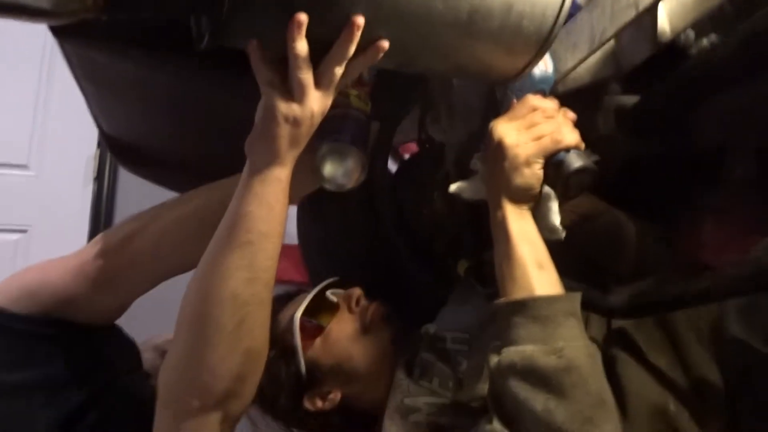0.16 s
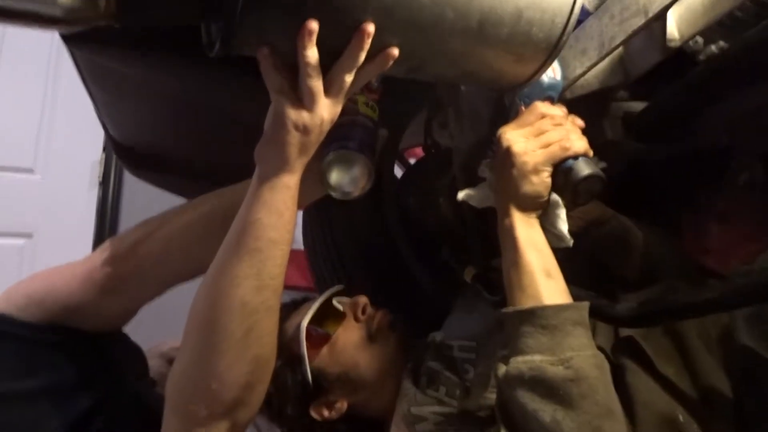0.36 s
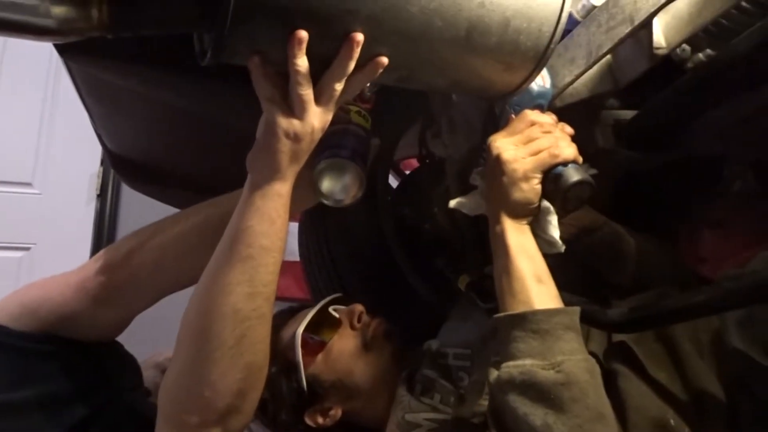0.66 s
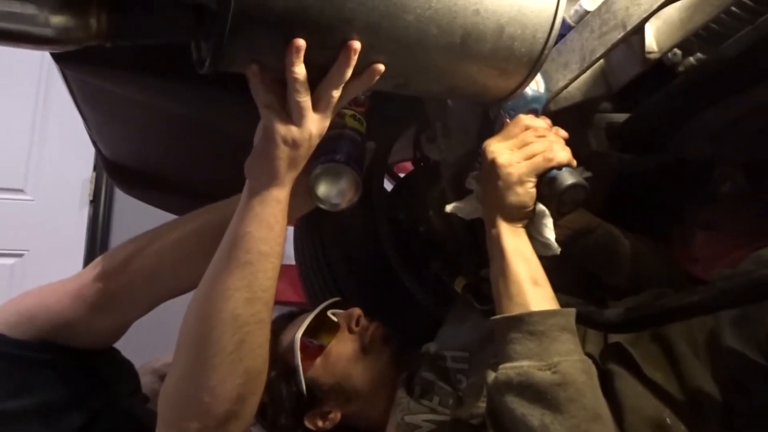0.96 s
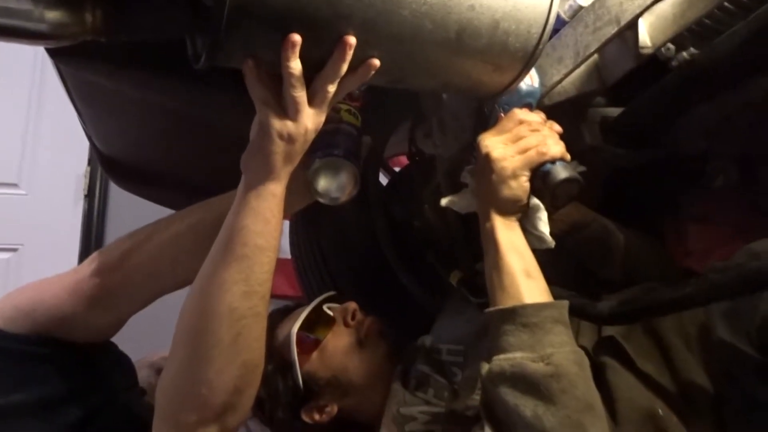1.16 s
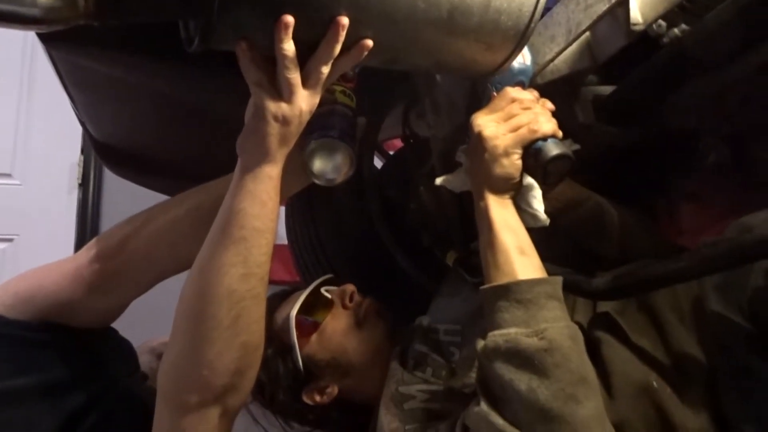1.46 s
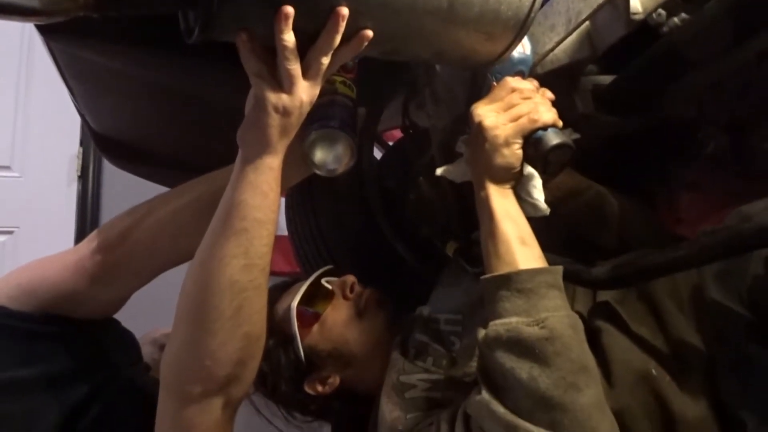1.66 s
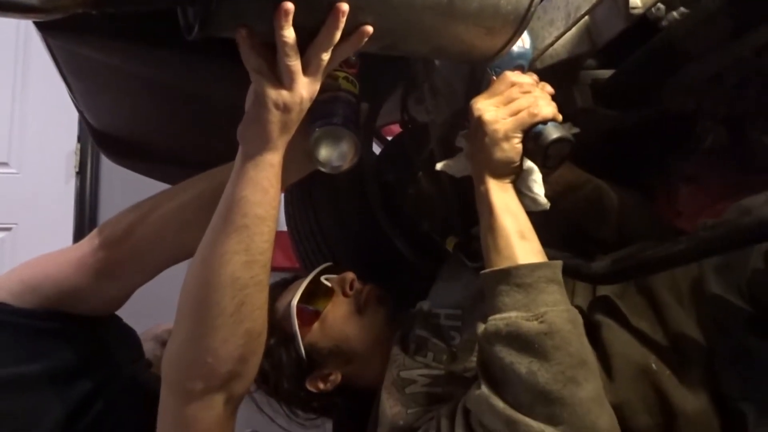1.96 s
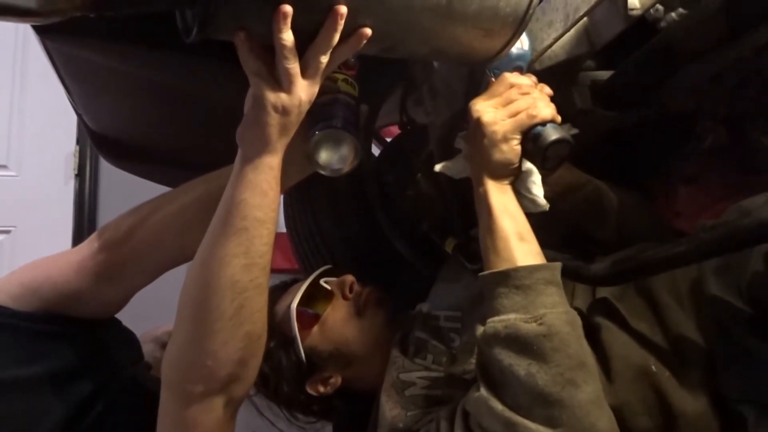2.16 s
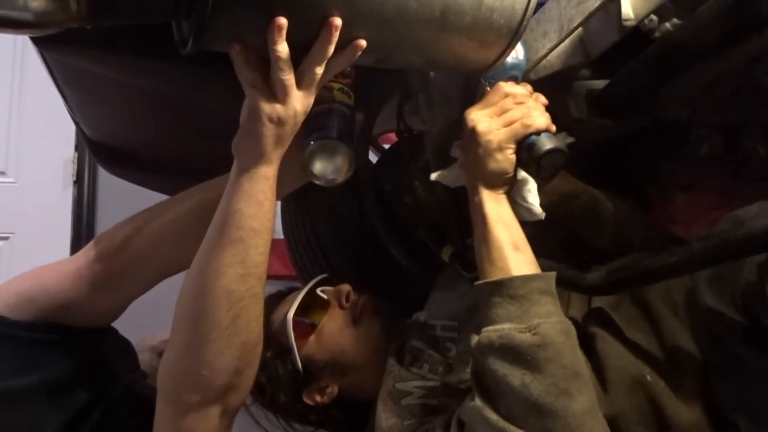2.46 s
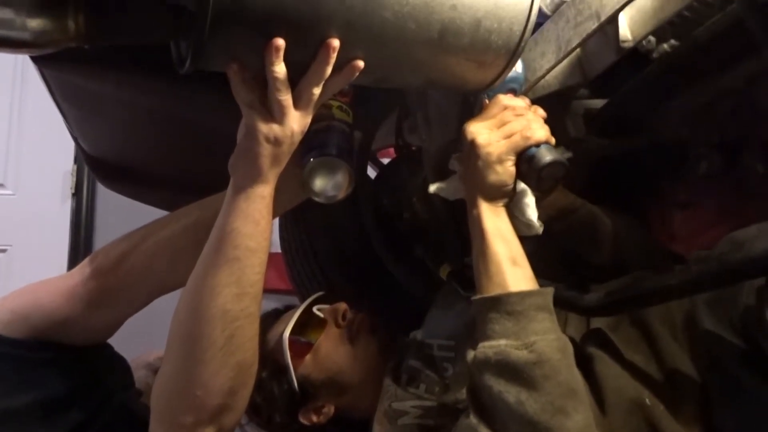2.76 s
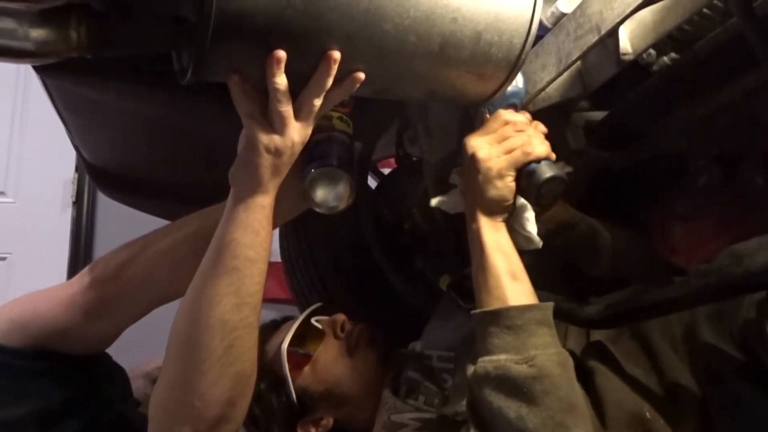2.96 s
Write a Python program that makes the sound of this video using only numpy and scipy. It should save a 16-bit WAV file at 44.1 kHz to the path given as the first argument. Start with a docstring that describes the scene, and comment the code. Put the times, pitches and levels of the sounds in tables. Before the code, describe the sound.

A battery reciprocating saw cuts a steel exhaust pipe under a car without pause, a fast buzzing metallic rasp with shifting rings, rougher near the end, heard close by on a phone in a garage.

```python
"""The fast, harsh rasp of a cordless reciprocating saw cutting a steel exhaust pipe under a car.
The same teeth drag over the cut on every stroke, so their force nearly repeats at the stroke rate.
Each new stroke bites with a knock, and this force rings the pipe and the silencer can.
Under it lie a faint motor hum and the low rumble of the garage, made from filtered noise.
A phone close by hears it all: it cuts the top treble and turns down the loudest peaks."""
import sys
import numpy as np
from scipy import signal
from scipy.fft import rfft, irfft
from scipy.io import wavfile
from scipy.ndimage import uniform_filter1d, minimum_filter1d, map_coordinates

SR = 44100
rng = np.random.default_rng(int(sys.argv[2]) if len(sys.argv) > 2 else 0)


def generate_wav(signal):
    """Clip the signal to [-1, 1] and save it as 16-bit WAV at the path in sys.argv[1]."""
    frames = np.transpose(np.atleast_2d(signal))
    scaled = np.clip(frames, -1, 1) * 32767
    pcm = np.round(scaled).astype(np.int16)
    wavfile.write(sys.argv[1], SR, pcm)


N = 136710  # length in samples

# Speed of the blade; the motor sags as the blade is pressed in: t/s, rate/strokes per s
STROKE_RATE = [(0, 37.7), (.1, 37.7), (.29, 38.2), (.53, 37.95), (.7, 37.35), (.86, 36.72), (1.05, 37.22),
               (1.19, 37.5), (1.28, 37.35), (1.42, 36.83), (1.52, 37.0), (1.73, 38.0), (1.86, 38.0),
               (1.98, 37.6), (2.18, 38.1), (2.34, 38.65), (2.48, 38.2), (2.65, 38.7), (2.76, 37.2),
               (2.9, 35.6), (3.1, 35.7)]
# How much of the tooth force repeats from stroke to stroke; rough near the end: t/s, share of power/0-1
REPEAT_SHARE = [(0, 0.27), (.2, 0.77), (1.6, 0.78), (2.5, 0.52), (2.7, 0.48), (3.1, 0.31)]
# Rasp in four ranges: t/s, level/dB under the lowest split, then middle, lower treble, upper treble
RASP_LEVELS = [(0.0, -43.5, -16.5, -24, -22.5), (0.48, -45, -19.5, -23, -20.5), (0.7, -45, -19, -23.5, -21),
               (0.83, -36, -18.5, -26, -24), (0.91, -39.5, -19, -24.5, -26.5),
               (1.11, -39.5, -19.5, -22.5, -21.5), (1.29, -45, -17, -25.5, -24),
               (1.39, -37.5, -17.5, -26, -24), (1.67, -45.5, -18, -25, -22), (2.3, -41.5, -17, -23, -19),
               (2.49, -44, -17.5, -25.5, -23.5), (2.54, -45, -15.5, -26, -19), (2.65, -41, -17, -24, -24.5),
               (2.72, -34.5, -13.5, -32, -29), (2.88, -37, -15.5, -27, -28.5), (2.93, -39, -16, -29, -29),
               (2.98, -34, -14.5, -28, -24.5), (3.0, -42, -15, -31, -30), (3.03, -40, -16, -27, -24),
               (3.1, -39.5, -15.5, -27, -24)]
# Borders between those four ranges: f/Hz
RASP_SPLITS = [840, 5600, 8000]
# Tone of the rasp between the modes, before its ranges are levelled: f/Hz, level/dB per Hz
RASP_TONE = [(30, -80), (400, -70), (560, -21), (680, -21), (800, -19), (1000, -1.5), (1250, -9.5),
             (1600, -7.5), (2500, -7), (3200, -2), (4000, -17), (5500, -4), (9000, -5.5), (11000, -7.5),
             (13000, -6.5), (16000, -17)]
# Weaker modes of pipe and can: f/Hz
MODE_PITCHES = [665, 775, 1049, 1165, 1500, 1745, 2131, 2401, 2545, 2699, 2818, 2958, 3251, 3340, 3750,
                4290, 4700, 5690, 6005, 6370, 6820, 6975, 7329, 7561, 7820, 8443, 8640, 8830, 9320, 9652,
                10100, 10300, 11500, 12800]
# Their widths: f/Hz
MODE_WIDTHS = [22, 25, 16, 40, 28, 40, 20, 18, 22, 35, 20, 40, 20, 90, 140, 80, 35, 50, 80, 60, 26, 70, 18,
               20, 55, 22, 40, 75, 66, 45, 80, 55, 50, 80]
# Their strengths relative to each other: level/dB
MODE_STRENGTHS = [-16.5, -21.5, -9.5, -8, -1.5, -2.5, -1.5, -6, -12, -7, -10, -4.5, -9.5, -6.5, -10.5, -10,
                  -1.5, -1, 4, -1, -6.5, -12, 0, 0, -7, -0.5, -9, -7, -0.5, 6, 2, 5.5, -18, -7]
# Strongest rings of pipe and can, low to high: f/Hz
RING_PITCHES = [893, 923.9, 1103.5, 1340, 1960, 2325, 2580, 3125, 4050, 4810, 5360]
# Width of each ring's first resonance: f/Hz
RING_WIDTHS = [14, 15, 16, 25, 45, 30, 300, 45, 900, 200, 140]
# Rings as the grip on the can shifts, before the bass is thinned: t/s, level/dB of each ring, low to high
RING_LEVELS = [(0.0, -44, -29, -33, -36, -25, -31, -34, -43, -39, -27, -32),
               (0.05, -35.5, -28.5, -23.5, -32, -22.5, -36, -27, -28, -34, -30, -22),
               (0.29, -31.5, -22.5, -27.5, -40, -27, -32, -29, -27, -28, -28, -27),
               (0.58, -30.5, -26.5, -23.5, -36, -24, -32, -32, -21.5, -31.5, -27, -24),
               (0.68, -28, -28, -34, -40, -25.5, -26, -34, -24, -29, -26, -24),
               (0.74, -25, -22, -38, -40, -30, -45, -30, -27, -32, -29, -24),
               (0.92, -40, -17.5, -32.5, -48, -27, -30, -30, -29.5, -29, -26, -26.5),
               (1.15, -29.5, -24, -34, -40, -23, -37, -29, -22, -31, -28, -27),
               (1.21, -29, -23.5, -42, -51, -23, -37, -29, -18.5, -33, -25, -34),
               (1.39, -37, -16, -33, -45, -26, -47, -33, -23, -32, -27, -23),
               (1.48, -36, -17.5, -44, -47, -34, -47, -29, -19.5, -34, -25, -34),
               (1.61, -28, -28, -47, -41, -25, -34, -35, -27, -32, -27.5, -29),
               (1.81, -37, -28, -24.5, -30, -27, -28, -27, -30.5, -27, -23.5, -31),
               (2.06, -32.5, -27, -31, -30.5, -24.5, -34, -42, -26, -34, -32, -34),
               (2.17, -33, -23, -25.5, -31, -25, -33, -46, -22, -30, -40, -27),
               (2.29, -26.5, -26, -34, -38, -36, -28, -49, -36, -27.5, -39, -22),
               (2.42, -41, -19, -33, -26, -28, -27, -36, -45, -28, -29, -31),
               (2.53, -45, -26.5, -31, -28, -25.5, -29, -40, -37, -27, -38, -23.5),
               (2.67, -29.5, -23, -25, -39, -23, -38, -33, -25, -22.5, -40, -28),
               (2.89, -32.5, -26, -61, -48, -40, -50, -28, -35, -24, -43, -33),
               (3.06, -26.5, -21.5, -40, -48, -26, -26, -25, -47, -31, -40, -21.5),
               (3.1, -24.5, -22, -44, -37, -23, -28, -31, -34, -28, -24, -31)]
# Push of the singing teeth on each ring, low to high: level/dB
RING_SWELLS = [10, 10, 6, 3, 4, 2, 6, 14, -20, 3, 4]
# The low rings hardly radiate below their pitch: f/Hz, level/dB
BASS_THINNING = [(20, -44), (500, -8.5), (850, -0.5), (22000, 0)]
# Tone of the faint garage rumble: f/Hz, relative level/dB per Hz
RUMBLE_TONE = [(20, -8), (60, -2), (150, -0.5), (300, 3), (500, 10), (800, -2), (2000, -60)]
# Faint motor hum: t/s, level/dB
HUM_LEVEL = [(0, -61.5), (1.3, -65), (1.6, -73), (3.1, -76)]
# Stereo width, side against mid: f/Hz, level/dB
STEREO_WIDTH = [(60, -14), (110, -19), (200, -49), (380, -4), (700, -27.5), (1290, -17), (2380, -12),
                (4400, -4), (8120, 0.5), (15000, -1)]

START_TURNS = 1.75  # place in the stroke cycle at the start
BITE_DB, BACK_DB, BITE_FADE_TURNS = 6, 2, 0.39  # jump at a bite, at the return stroke; fall to 37 %
BITE_SCATTER_DB, BITE_JITTER_TURNS = 1.2, .03  # random spread of the jump and of its delay
PATTERN_LIFE = 0.874  # likeness of one stroke's tooth pattern to the next
GRIT_DB, GRIT_FROM_HZ = 2, 1500  # mean random boost of fresh grit; it is thin below this pitch
KNOCK_DB, KNOCK_SCATTER_DB = -19, 7.1  # level beside the rasp; spread if no force repeated
SCATTER_T60_S, GARAGE_T60_S = 0.077, 0.2  # time for echoes to fall 60 dB
MODES_DB, MODE_WALK_DB = -26, 2.5  # shared mode level before range levelling; random wandering
SWELL_S = .016  # length of one swell of singing
RUMBLE_DB, RUMBLE_FLICKER_DB = -54, 3
HUM_HZ = 260.7
TREBLE_LEAN_DB = 5  # left against right, before the lean is shaped by pitch
TOP_HZ = 16000
LIMIT, LIMIT_S = .94, .003  # highest peak aimed for (full scale = 1), reach of the limiter


def undb(db):
    """Turn decibels into a plain amplitude factor."""
    return 10 ** (np.asarray(db) / 20)


def unit(x):
    """Scale to an average (RMS) level of 1."""
    return x / np.sqrt(np.mean(x ** 2))


def curve(table, col):
    """Draw straight lines through one column of a table over time."""
    points = np.array(table)
    return np.interp(np.arange(N) / SR, points[:, 0], points[:, col])


def smooth_twice(x, k):
    """Take a moving average over k samples, two times."""
    return uniform_filter1d(uniform_filter1d(x, k), k)


def walk(rate):
    """Random levels held 1 / rate s and slewed twice; spread near 1."""
    k = int(SR / rate)
    held = np.repeat(rng.standard_normal(N // k + 1), k)
    return 1.4 * smooth_twice(held, k)[:N]


def steady(x, span_s=0.073):
    """Divide out the slow level so that a curve can set it."""
    return x / np.sqrt(smooth_twice(x ** 2, int(span_s * SR)) + 1e-12)


def colour(x, table):
    """Shape the tone by (f/Hz, level/dB) points, joined on a logarithmic pitch scale."""
    hz = np.arange(N // 2 + 1) * SR / N + 1
    points = np.array(table, float)
    gain_db = np.interp(np.log(hz), np.log(points[:, 0] + 1), points[:, 1])
    return irfft(rfft(x) * undb(gain_db), N)


def mode(x, hz, width_hz):
    """Two-pole resonance, like one ringing pitch of metal; gain 1 at the centre."""
    return signal.lfilter(*signal.iirpeak(hz, hz / width_hz, fs=SR), x)


def scatter(x, t60_s):
    """Dense reflections between floor, car and walls: fading noise as an echo."""
    t = np.arange(16384) / SR
    echo = rng.standard_normal(len(t)) * undb(-60 * t / t60_s)
    return unit(signal.fftconvolve(x, echo)[:N])


def worn_teeth(turns, strokes):
    """Repeating tooth force: each stroke replays the last one's pattern, slightly changed."""
    points = 1170  # pattern points per stroke
    warmup = 20  # strokes dropped while the pattern settles
    noise = rng.standard_normal((strokes + warmup, points))
    pattern = signal.lfilter([np.sqrt(1 - PATTERN_LIFE ** 2)], [1, -PATTERN_LIFE], noise, axis=0)[warmup:]
    return unit(map_coordinates(pattern.ravel(), [turns * points], order=3))


def fresh_grit():
    """Grit that never repeats: uneven noise with thin bass."""
    grit = unit(rng.standard_normal(N) * undb(GRIT_DB * rng.exponential(size=N)))
    return colour(grit, [(20, -8), (1200, -8), (GRIT_FROM_HZ, 0), (22000, 0)])


def teeth():
    """Force on the pipe: a tooth pattern that slowly wears, fresh grit, and a knock at each bite."""
    turns = START_TURNS + np.cumsum(curve(STROKE_RATE, 1)) / SR
    stroke = turns.astype(int)
    strokes = 130  # more than are played
    delay_draw, bite_draw, knock_draw = rng.standard_normal((strokes, 3))[stroke].T
    worn = worn_teeth(turns, strokes)
    fresh = fresh_grit()
    share = curve(REPEAT_SHARE, 1)
    since_bite = turns - stroke - np.abs(BITE_JITTER_TURNS * delay_draw)
    bite_db = (BITE_DB + BITE_SCATTER_DB * bite_draw) * np.exp(-(since_bite % 1) / BITE_FADE_TURNS)
    back_db = BACK_DB * np.exp(-((turns + .5) % 1) / BITE_FADE_TURNS)  # half a turn later
    grind = np.sqrt(share) * worn + np.sqrt(1 - share) * fresh
    rasp = unit(grind * undb(bite_db * (since_bite > 0) + back_db))
    clicks = np.diff(stroke, prepend=stroke[0])  # one sample at each new stroke
    knock = unit(clicks * undb(KNOCK_SCATTER_DB * (1 - share) * knock_draw))
    return rasp, knock


def weak_modes(force):
    """Weaker resonances of pipe and can, each wandering in level."""
    total = 0
    for hz, width, db in zip(MODE_PITCHES, MODE_WIDTHS, MODE_STRENGTHS):
        level = undb(MODES_DB + db + MODE_WALK_DB * walk(4.056))
        total = total + level * steady(mode(force, hz, width), 0.28)
    return colour(total, BASS_THINNING)


def level_rasp(body):
    """Split the body sound into four pitch ranges and give each its own level over time."""
    lower, out = 0, 0
    for col, hz in enumerate(list(RASP_SPLITS) + [None], start=1):
        if hz is None:
            upper = body
        else:
            upper = signal.sosfiltfilt(signal.butter(4, hz, fs=SR, output="sos"), body)
        out = out + steady(upper - lower) * undb(curve(RASP_LEVELS, col))
        lower = upper
    return out


def strong_rings(force, knock):
    """Strongest rings: evenly spaced teeth sing at each ring once a stroke and drive it with the force."""
    clean = np.clip(1.29 * curve(REPEAT_SHARE, 1), 0, 1) ** 2  # singing fades as the cut turns rough
    t = np.arange(int(SWELL_S * SR)) / SR
    rings = 0
    for j, (hz, width) in enumerate(zip(RING_PITCHES, RING_WIDTHS)):
        swell = np.sin(np.pi * t / SWELL_S) ** 2 * np.sin(2 * np.pi * hz * t)
        singing = signal.fftconvolve(knock * clean, swell)[:N] * 4 / len(t)
        drive = force + undb(RING_SWELLS[j]) * singing
        ring = steady(mode(mode(drive, hz, width), hz, 3.94 * width), 0.084)
        sign = -1 if j == 0 else 1  # the lowest pair moves in opposition, which sets its beat
        rings = rings + sign * ring * undb(curve(RING_LEVELS, j + 1))
    return colour(rings, BASS_THINNING)


def pipe(rasp, knock):
    """The struck metal: levelled rasp with weak modes in it, plus the strongest rings."""
    force = rasp + undb(KNOCK_DB) * knock
    body = colour(0.5 * scatter(rasp, SCATTER_T60_S) + rasp, RASP_TONE)
    body = body + weak_modes(force)
    return level_rasp(body) + strong_rings(force, knock)


def garage_rumble():
    """Faint low noise whose level flickers."""
    flicker = undb(RUMBLE_FLICKER_DB * walk(14.))
    return unit(colour(rng.standard_normal(N) * flicker, RUMBLE_TONE)) * undb(RUMBLE_DB)


def motor_hum():
    """Faint hum: noise through one narrow resonance."""
    return unit(mode(rng.standard_normal(N), HUM_HZ, 7.9)) * undb(curve(HUM_LEVEL, 1))


def scene():
    """Mix the sources and spread them in stereo with garage echoes and a treble lean to the left."""
    mid = pipe(*teeth()) + garage_rumble() + motor_hum()
    side = colour(scatter(mid, GARAGE_T60_S), STEREO_WIDTH) * np.sqrt(np.mean(mid ** 2))
    treble = colour(mid, [(20, -40), (5000, -59), (8000, -11), (22000, 6)])
    lean = treble * (undb(TREBLE_LEAN_DB / 2) - 1)
    return np.array([mid + side + lean, mid - side - lean])


def cut_top(x):
    """Steep low-pass filter: almost nothing passes well above TOP_HZ."""
    return signal.sosfilt(signal.ellip(12, .2, 80, TOP_HZ, fs=SR, output="sos"), x)


def record(dry):
    """The phone cuts the top and its limiter turns down the rare loudest peaks."""
    top = cut_top(dry)
    k = int(LIMIT_S * SR)
    needed = np.minimum(1, LIMIT / (np.abs(top).max(axis=0) + 1e-9))
    gain = smooth_twice(minimum_filter1d(needed, 2 * k + 1), k)  # starts before each peak
    return cut_top(top * gain)


dry = scene()
out = record(dry)
generate_wav(out)
```